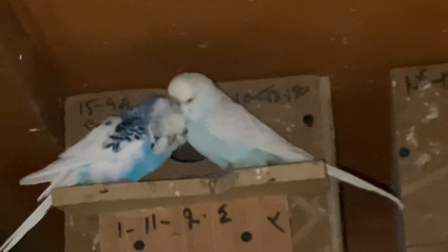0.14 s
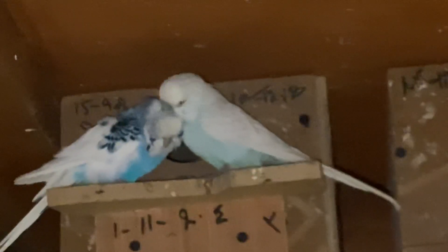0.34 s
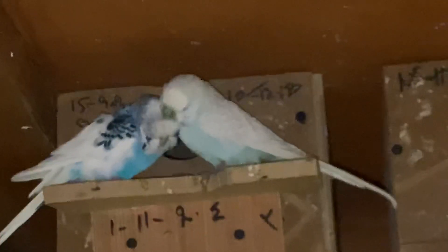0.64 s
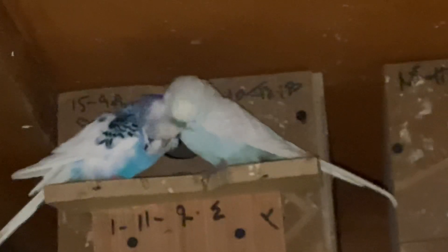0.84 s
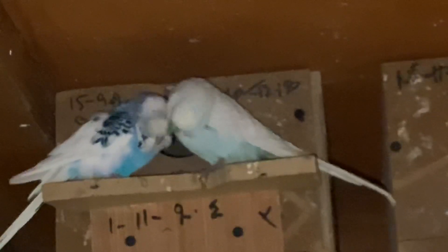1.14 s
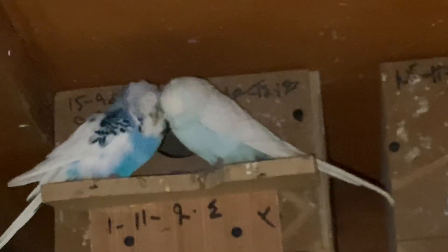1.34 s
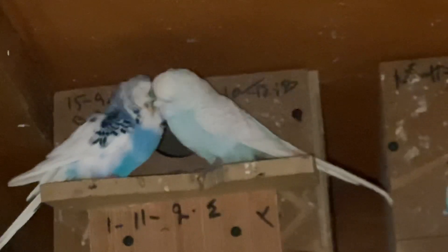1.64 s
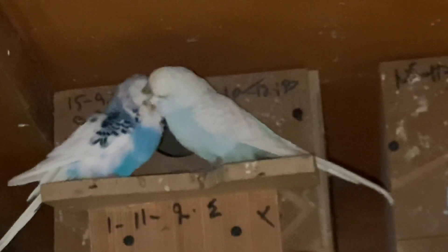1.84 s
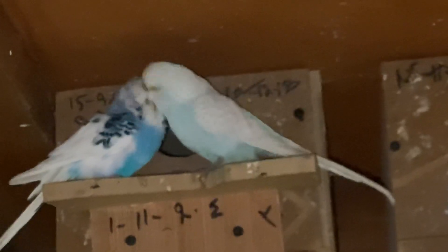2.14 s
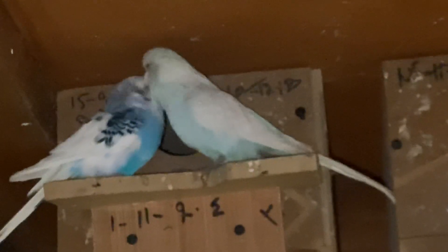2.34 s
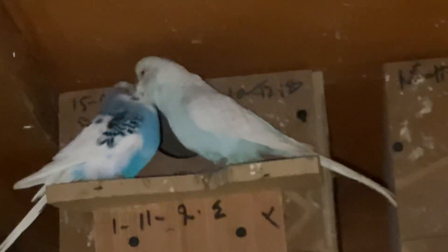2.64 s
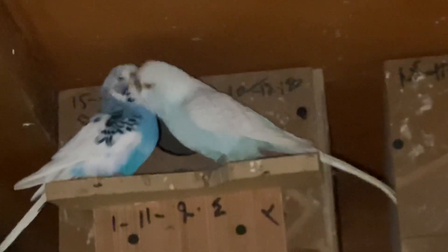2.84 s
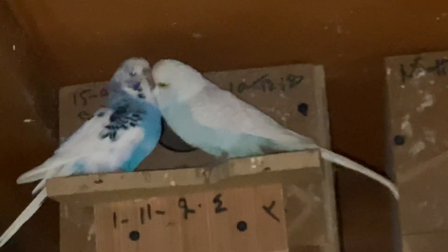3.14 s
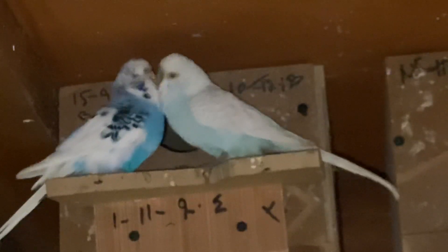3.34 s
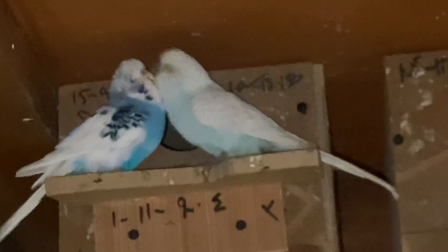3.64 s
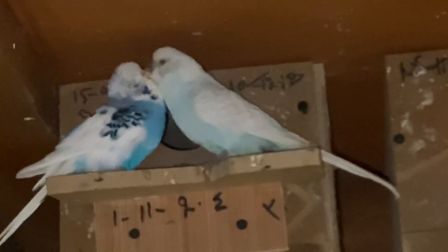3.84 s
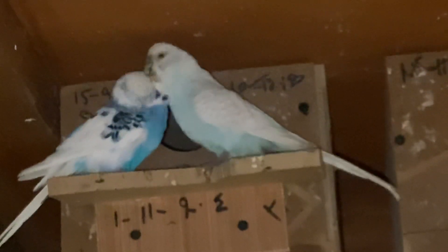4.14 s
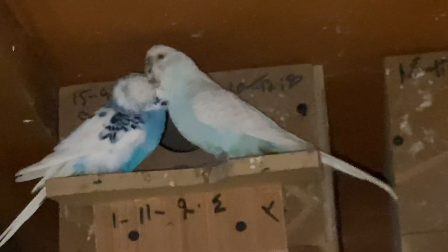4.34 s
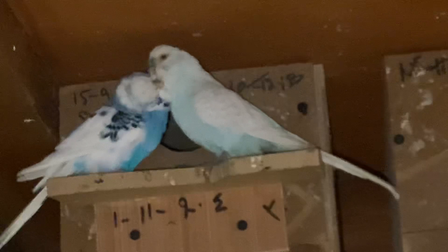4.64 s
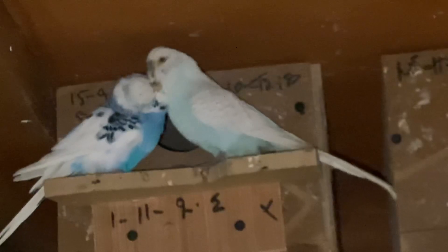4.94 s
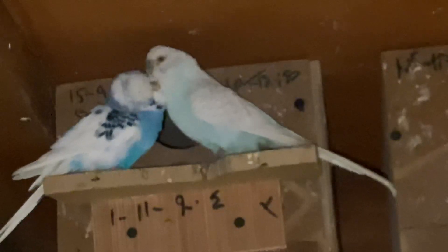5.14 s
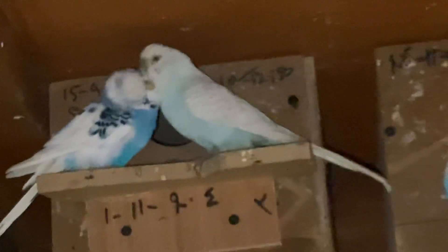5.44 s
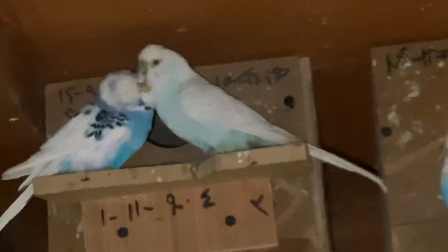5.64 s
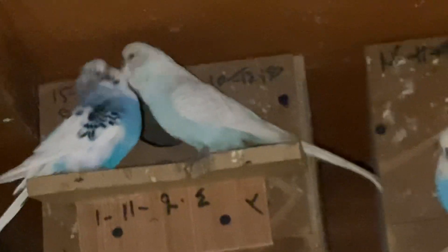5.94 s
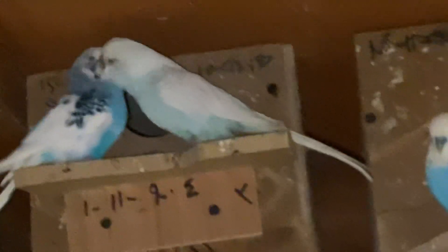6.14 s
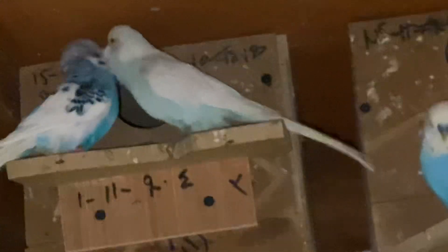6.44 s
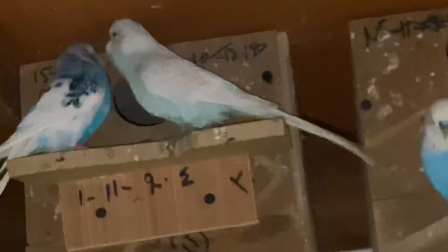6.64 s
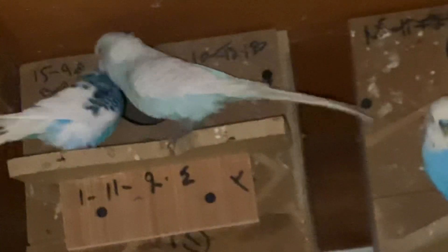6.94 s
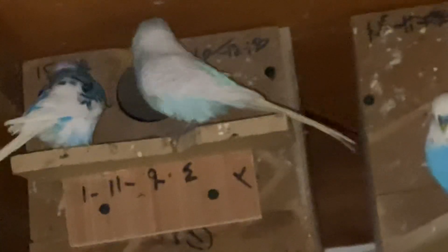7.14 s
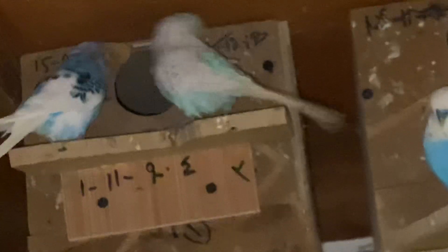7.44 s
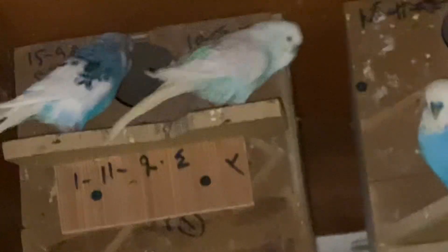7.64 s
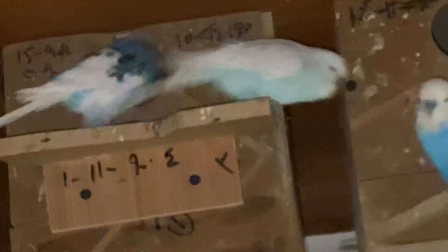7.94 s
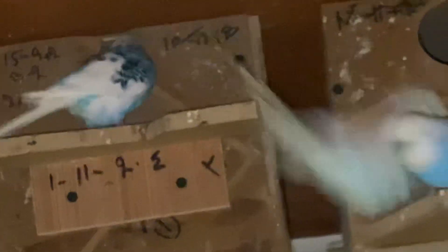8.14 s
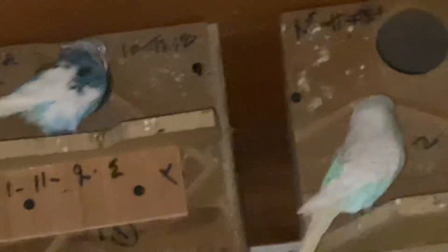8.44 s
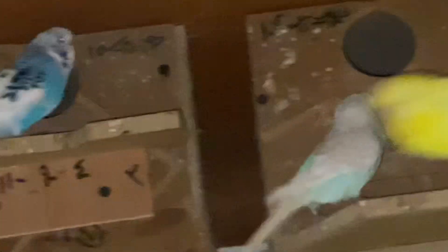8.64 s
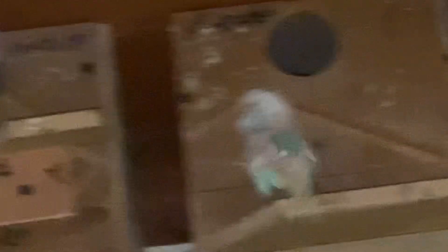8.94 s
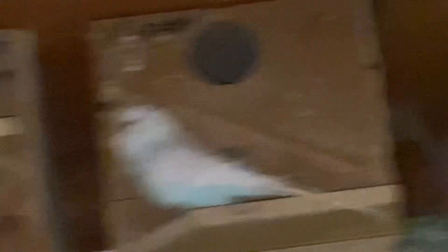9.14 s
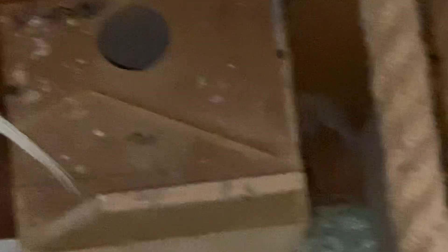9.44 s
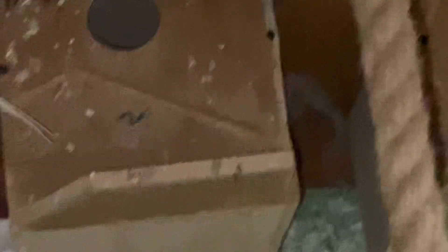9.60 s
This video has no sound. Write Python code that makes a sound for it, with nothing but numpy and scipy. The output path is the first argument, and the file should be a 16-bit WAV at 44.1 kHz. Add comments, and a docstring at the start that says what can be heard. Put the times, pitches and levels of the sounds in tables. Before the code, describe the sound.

A low, wavering hum fills an echoing wooden bird room. Small parrots give quick gliding chirps separated by pauses, with faint chatter from birds farther away. Low, gentle warbling and a hollow wing flutter gather midway, then thin out again. Finally several loud, raspy squawks arrive in rapid succession, mixed with bright whistles, thicker chatter and bursts of wingbeats, all heard from a little distance with a narrow stereo spread.

```python
"""Whistled notes open the scene: budgerigars in a bare, echoing room, near ones warbling softly, others far off.
Harsh buzzing squawks break in, more densely towards the end; wings flap in short flights over chatter and hum.
Whistles are gliding tones with overtones, squawks are rapidly restarted upward sweeps roughened by breath,
wing beats are short windowed tones, and the room hum is shaped noise. Decaying noise forms the echo."""
import sys
import numpy as np
from scipy import signal
from scipy.fft import rfft, irfft, next_fast_len
from scipy.io import wavfile
from scipy.ndimage import uniform_filter1d, map_coordinates

SR = 44100
rng = np.random.default_rng(int(sys.argv[2]) if len(sys.argv) > 2 else 0)


def bounce(signal):
    """Save signal as a 16-bit WAV file at the path given by the first command-line argument."""
    frames = np.transpose(np.atleast_2d(signal))
    limited = np.clip(frames, -1, 1)
    pcm = np.round(limited * 32767).astype(np.int16)
    wavfile.write(sys.argv[1], SR, pcm)


N = 430857

# Below, "level" is that of the source before echo and filters; "overtones" is the second harmonic
# relative to the fundamental.
# Straight whistled glides. Each row: start in seconds, length in seconds, start pitch in Hz, end pitch in Hz,
# level in dB, distance in metres.
WHISTLE_NOTES = [(0, 0.061, 5800, 5420, -37.5, 7.5), (0.237, 0.079, 4460, 5460, -42.5, 7.6),
                 (0.383, 0.035, 2534, 2424, -36.5, 0.75), (0.465, 0.023, 3500, 2560, -38.5, 0.28),
                 (0.475, 0.038, 2590, 2420, -37, 0.53), (0.48, 0.066, 4510, 4980, -42.5, 5.9),
                 (0.506, 0.012, 1990, 1410, -42, 2.3), (2.432, 0.056, 5850, 5740, -59.5, 5.6),
                 (2.479, 0.062, 5030, 4300, -55, 7.2), (3.03, 0.024, 2030, 1490, -55, 1.7),
                 (3.119, 0.015, 3020, 3140, -58.5, 2.1), (3.274, 0.053, 3550, 3960, -61.5, 5.3),
                 (3.444, 0.025, 3290, 3550, -39.5, 10.3), (3.485, 0.02, 2674, 2990, -33, 3.6),
                 (3.518, 0.06, 6180, 5870, -36.5, 5.9), (3.554, 0.042, 4900, 4190, -32, 6.1),
                 (3.939, 0.16, 2448, 2240, -44, 9), (4.266, 0.051, 3000, 2940, -57, 2.2),
                 (4.455, 0.023, 2300, 2230, -57, 1.9), (4.461, 0.022, 6030, 5020, -51, 3.4),
                 (4.778, 0.06, 5450, 6500, -58, 6), (4.863, 0.062, 4150, 4210, -47.5, 4.3),
                 (4.842, 0.032, 3073, 3225, -37.5, 4.5), (4.887, 0.023, 2776, 2560, -35, 5.9),
                 (4.926, 0.019, 1950, 1990, -40.5, 4.5), (5.243, 0.078, 1257, 1062, -52, 1.4),
                 (5.345, 0.038, 2964, 3256, -36, 5.4), (5.365, 0.037, 1870, 2090, -44, 1.8),
                 (5.388, 0.03, 2760, 2880, -34.5, 7.2), (5.585, 0.051, 1122, 1101, -44.5, 0.65),
                 (5.618, 0.049, 2013, 2103, -37, 11.6), (5.676, 0.039, 2600, 2720, -38.5, 5.6),
                 (5.705, 0.073, 1916, 1605, -43, 6.3), (5.76, 0.025, 2600, 2730, -37, 4.9),
                 (5.637, .04, 4060, 4000, -50, 5), (5.808, 0.06, 1527, 2350, -47, 1.1),
                 (5.888, 0.027, 2330, 1155, -45, 1.1), (5.935, 0.06, 1474, 1705, -44, 5.2),
                 (5.942, 0.064, 3370, 3240, -47.5, 3.9), (5.966, 0.027, 1410, 1035, -45, 2.7),
                 (5.993, 0.085, 1080, 1002, -47, 2.2), (6.135, 0.051, 1245, 2080, -47, 1.2),
                 (6.192, 0.049, 2295, 1594, -45.5, 0.51), (6.259, 0.082, 1410, 1436, -55.5, 0.4),
                 (6.346, 0.064, 2970, 3474, -35, 3.5), (6.402, 0.023, 2660, 2820, -30.5, 2.7),
                 (6.55, 0.0205, 3550, 3540, -33, 2.2), (6.578, 0.041, 3060, 2886, -31, 6.4),
                 (6.603, 0.065, 2060, 2122, -38, 7.1), (6.64, 0.0434, 3590, 3450, -29, 2.27),
                 (6.691, 0.068, 1987, 1642, -40, 11), (7.145, 0.054, 3150, 3130, -51.5, 6.8),
                 (7.245, 0.039, 3226, 3160, -42.5, 3.4), (7.281, 0.026, 2550, 2370, -46, 3),
                 (7.932, 0.069, 1223, 1236, -60.5, 2.6), (8.592, 0.036, 4690, 4580, -28, 7.3),
                 (8.619, .11, 3408, 3030, -26, 5.8), (8.725, 0.011, 1885, 1760, -31, 1),
                 (8.855, 0.032, 3040, 2250, -37, 1.4), (8.873, 0.0098, 4970, 4440, -32, 1.5),
                 (9.139, 0.022, 3160, 2100, -34.5, 2.2), (9.235, 0.023, 4240, 4200, -29.5, 0.77),
                 (9.368, 0.045, 4200, 2740, -40.5, 2.4), (9.359, 0.028, 2895, 1840, -44, 2.4),
                 (9.439, 0.067, 1834, 2520, -41.5, 3.7), (9.534, 0.031, 3990, 2440, -33, 5.9),
                 (9.598, 0.043, 3130, 3284, -26.5, 0.42), (9.66, 0.02, 2590, 1910, -39.5, 0.84)]
# Bent whistled notes. Each row: start in seconds, length in seconds, start, middle and end pitch in Hz,
# level in dB, overtones in dB, distance in metres.
BENT_NOTES = [(0.355, 0.022, 3800, 3930, 3860, -46.5, -2, 3.9),
              (0.406, 0.057, 2420, 3230, 3600, -35, -22.5, 1.34),
              (4.367, 0.097, 3300, 4190, 4470, -61.5, -24, 3.7),
              (4.558, 0.19, 1750, 2395, 1890, -40.5, -11.5, 4.35),
              (5.3, 0.052, 1090, 1244, 1460, -56, -0.5, 3.6),
              (5.411, 0.032, 2160, 2210, 1910, -44.5, -5.5, 0.74),
              (8.663, 0.053, 3320, 3550, 3660, -27, -13.5, 2.2),
              (8.89, 0.046, 4137, 3070, 1856, -27.5, -24, 2.7)]
# One long clean note that swells slowly. Each row: start in seconds, length in seconds,
# start, middle and end pitch in Hz, level in dB, overtones in dB.
PIPING_NOTES = [(0.839, .34, 1715, 1820, 2028, -28.5, -37)]
# Buzzing squawks. Each row: start in seconds, length in seconds, pitch in Hz, level in dB, overtones in dB.
SQUAWK_CALLS = [(1.139, 0.14, 3395, -48, -16.5), (2.806, 0.04, 2440, -47, -15),
                (2.922, 0.014, 2080, -50, -13), (3.185, 0.012, 1960, -53, -13),
                (3.214, 0.022, 1915, -51.5, -12), (3.509, 0.079, 2853, -36, 1.5),
                (5.574, 0.08, 2750, -44.5, -7), (6.091, 0.05, 2453, -41, -11.5),
                (6.406, 0.057, 2550, -41.5, -4), (6.561, 0.07, 2474, -49, 0),
                (6.68, 0.049, 2444, -30, -17.5), (7.228, 0.088, 2710, -46, -9.5),
                (8.329, 0.047, 2837, -38.5, 2), (8.424, 0.048, 2620, -36, 5.5),
                (8.529, 0.095, 2916, -35.5, 4), (8.625, 0.037, 3256, -30, 3.5),
                (8.722, 0.053, 2495, -36, 9), (8.827, 0.08, 3250, -30, -0.5),
                (8.936, 0.023, 2555, -38, -2.5), (9.01, 0.068, 3250, -38.5, 5.5),
                (9.063, 0.078, 3210, -33, 5.5), (9.135, 0.05, 2390, -50.5, 20.5),
                (9.217, 0.036, 2406, -40.5, 10.5), (9.282, 0.2, 2483, -43.5, -6.5),
                (9.597, 0.081, 3293, -32, 0), (9.707, 0.11, 2917, -33, 6.5)]
# Short flights. Each row: strongest wing beat in seconds, spread in seconds, peak level in dB.
WING_FLIGHTS = [(4.78, 0.2, -45.5), (5.95, 0.29, -43), (8.36, .14, -37), (9.31, 0.084, -37),
                (9.75, 0.16, -35.5)]
# Background levels over time. Each row: time in seconds, hum in dB, distant chatter in dB.
ROOM_LEVELS = [(0, -57.5, -63.5), (.95, -54.5, -71), (1.1, -51, -79), (1.65, -60.5, -70),
               (3.42, -55.5, -77), (3.95, -55.5, -53), (4.25, -60.5, -60), (4.8, -54.5, -59),
               (5.15, -55.5, -70.5), (5.8, -48.5, -62), (6.37, -56, -70), (6.9, -55.5, -91),
               (7.801, -58, -73), (8.3, -49.5, -61), (8.7, -52.5, -54), (9.3, -53, -58), (9.77, -44, -40)]
# Spectral shape of the hum. Each row: frequency in Hz, relative density in dB per Hz.
HUM_SPECTRUM = [(20, -24), (65, 2.5), (150, -6.5), (330, -7), (470, -8), (800, -10), (1300, -20.5),
                (1900, -17), (7000, -28), (11000, -25.5)]
# Phase between the two microphone ports. Each row: frequency in Hz, lead of the left in radians.
PORT_PHASE = [(400, -.1), (1300, -.75), (1750, .3), (3200, .55), (5000, 0), (7400, -.2), (8550, -3.14),
              (9730, -6.2), (10600, -6.7), (11800, -9.4), (12600, -9.45), (13250, -12.4), (15100, -13.3)]
# Microphone roll-off. Each row: frequency in Hz, gain in dB.
TREBLE_ROLLOFF = [(7000, 1), (11300, 0), (12000, -3), (15000, -13.5)]

EQUAL_ECHO_M, HEARD_DB = 2.55, 4.5  # distance where echo equals direct sound; gain of both together
OVERTONES_1KHZ_DB, THINS_DB_PER_OCTAVE = -4, 12  # overtones of a 1 kHz note; higher notes are purer
ROUGH, ROUGH_PER_M = .3, .1  # far voices arrive rougher
BEAT_S, FLAP_HZ = .0555, 479  # wing stroke period; mean pitch of the clap of air
TOP_HZ = 15480  # band limit


def birds():
    """Direct-to-reverberant ratio: near notes are mostly direct sound, far notes mostly echo."""
    out = np.zeros((2, N))
    notes = []
    for s, length, start_hz, end_hz, db, metres in WHISTLE_NOTES:
        middle_hz = (start_hz + end_hz) / 2
        over_db = OVERTONES_1KHZ_DB - THINS_DB_PER_OCTAVE * np.log2(middle_hz / 1000)
        notes.append((s, length, start_hz, middle_hz, end_hz, db, over_db, metres))
    for s, length, *path, db, over_db, metres in notes + BENT_NOTES:
        far = (metres / EQUAL_ECHO_M) ** 2  # echo power over direct power
        note = whistle(length, *path, over_db, rough=ROUGH + ROUGH_PER_M * metres)
        direct_db, echo_db = -10 * np.log10(1 + far), -10 * np.log10(1 + 1 / far)
        add_in_room(out, s, amp(db + HEARD_DB) * note, direct_db, echo_db)
    for s, length, *path, db, over_db in PIPING_NOTES:
        note = whistle(length, *path, over_db, rough=.4, rise=1.7)
        add_in_room(out, s, amp(db) * note, direct_db=-8, echo_db=3, t60=.75)
    for s, length, pitch_hz, db, over_db in SQUAWK_CALLS:
        add_in_room(out, s, amp(db) * squawk(length, pitch_hz, over_db), direct_db=3, echo_db=-4)
    return out


def whistle(length, start_hz, middle_hz, end_hz, over_db, rough, rise=0.026):
    """Frequency and amplitude modulation: a glide whose pitch and strength flutter fast, with a breathy rasp."""
    u = np.linspace(-1, 1, round(length * SR))  # -1 at the start of the note, 1 at its end
    bend_hz = (start_hz + end_hz) / 2 - middle_hz
    hz = middle_hz + (end_hz - start_hz) * u / 2 + bend_hz * u * u
    hz *= 1 + 0.04245 * rough * flutter(len(u), rate=250)
    swell = np.clip(np.minimum((1 + u) / rise, (1 - u) / 0.1), 0, 1)
    throb = amp(5.45 * rough * flutter(len(u), rate=304.6))
    throb *= 1 + 0.15 * rough * flutter(len(u), rate=4600)  # breath
    throb /= np.sqrt(np.mean(throb ** 2))
    return swell * throb * syrinx(hz, over_db)


def squawk(length, pitch_hz, over_db, rate=190, sweep=.33, breath=.95):
    """Periodic bursts: the voice restarts about rate times a second, each burst sweeping upward with breath."""
    t = np.arange(round(length * SR)) / SR
    cycle = (rate * t + 0.16 * flutter(len(t), rate=60)) % 1
    hz = pitch_hz * (1 + sweep * (cycle - .5) + 0.0513 * flutter(len(t), rate=80))
    bursts = np.sin(np.pi * cycle) ** 0.4 * syrinx(hz, over_db)
    swell = np.sin(np.pi * (t / length) ** .6) ** .7
    return swell * bursts * (1 + breath * flutter(len(t), rate=2300))


def syrinx(hz, over_db, fall_db=3.0):
    """Harmonic series: each overtone past the second harmonic falls by fall_db per kHz of the fundamental."""
    phase = 2 * np.pi * np.cumsum(hz) / SR
    k = np.arange(2, 7)[:, None]
    strength = amp(over_db - fall_db * (k - 2) * hz / 1000)
    strength = strength * (k * hz < SR / 2)  # nothing above half the sample rate
    overtones = strength * np.sin(k * phase)
    return np.sqrt(2) * (np.sin(phase) + overtones.sum(0))


def wings(count=8):
    """Impulsive air displacement: each stroke is a soft hollow flap; a flight swells and fades about its peak."""
    out, t = np.zeros((2, N)), np.arange(SR // 60) / SR
    for s, spread, db in WING_FLIGHTS:
        flight = np.zeros(SR)
        for k, (late_ms, pitch, loud) in enumerate(rng.standard_normal((2 * count, 3))):
            flap = np.hanning(len(t)) * np.sin(2 * np.pi * FLAP_HZ * (1 + .07 * pitch) * t)
            swell = np.exp(-((k - count) * BEAT_S / spread) ** 2 / 2)
            start = round((k * BEAT_S + abs(late_ms) / 1000) * SR)
            flight[start:][:len(t)] += amp(db + 2 * loud) * swell * flap
        add_in_room(out, s - count * BEAT_S - t[-1] / 2, flight, direct_db=-6, echo_db=-7)
    return out


def chatter(count=1500, size=SR // 5):
    """Random superposition: many distant birds' steep rough glides and squawks overlap, blurred by echo."""
    out, voices = np.zeros((2, N)), np.zeros(N + SR)
    times, _, level_db = np.transpose(ROOM_LEVELS)
    for when, pitch, bend, loud, kind in rng.random((count, 5)):
        s, hz = when * N / SR, 1900 * 3 ** pitch ** 1.6
        sweep = (.15 + .25 * bend) * np.sign(bend % .1 - .03)  # most fall
        if kind < .6:
            note = squawk(0.033, 2000 + 1300 * pitch, over_db=-4.5)
        else:
            note = whistle(.022, hz * (1 + sweep), hz, hz * (1 - sweep), over_db=-14, rough=1.7)
        gain = amp(np.interp(s, times, level_db) + 4 * loud - 4)
        voices[round(s * SR):][:len(note)] += gain * note
    for start in range(0, N, size):  # each stretch draws its own echo
        add_in_room(out, start / SR, voices[start:start + size], direct_db=3, echo_db=0.0)
    return out


def hum():
    """Stationary noise through a spectral envelope: broad room noise whose level wavers."""
    noise = filtered(rng.standard_normal((2, N)), lambda hz: amp(along(HUM_SPECTRUM, hz)))
    times, level_db, _ = np.transpose(ROOM_LEVELS)
    wavering_db = np.interp(np.arange(N) / SR, times, level_db) + 1.2 * flutter(N, rate=9.9)
    return amp(wavering_db) * noise / noise[0].std()


def add_in_room(out, s, sound, direct_db, echo_db, t60=0.64):
    """Reverberation: direct path in mid, plus the bare walls' echo in mid and side, which dulls as it dies."""
    t = np.arange(SR * 3 // 4) / SR
    noise = rng.standard_normal((2, len(t)))
    noise *= amp(5 * flutter(len(t), rate=200))  # reflections arrive in clumps
    dull = uniform_filter1d(noise, size=7)
    bright = noise - dull
    tail = dull * amp(-60 * t / t60) + bright * amp(-60 * t / (0.68 * t60))
    # the nearest walls answer first and strongest
    tail *= (1 - np.exp(-t / 0.0072)) * (1 + 2.2 * np.exp(-t / 0.035))
    tail *= amp(echo_db) / np.linalg.norm(tail[0])
    tail[0, 0] = amp(direct_db)
    heard = signal.fftconvolve(sound[None], tail, axes=1)
    spot = out[:, round(s * SR):][:, :heard.shape[1]]
    spot += heard[:, :spot.shape[1]]


def flutter(size, rate):
    """Band-limited randomness: a smooth curve through rate random knots a second."""
    knots = rng.standard_normal(int(size * rate / SR) + 4)
    return map_coordinates(knots, [np.arange(size) * rate / SR])


def filtered(x, response):
    """Linear filtering: the spectrum of x times a response of frequency in Hz."""
    m = next_fast_len(x.shape[-1] + 8192)
    spectrum = rfft(x, m) * response(np.fft.rfftfreq(m, 1 / SR))
    return irfft(spectrum, m)[..., :x.shape[-1]]


def along(points, hz):
    """Interpolation of (Hz, value) points on a logarithmic frequency axis."""
    f, v = np.transpose(points)
    return np.interp(np.log(hz + 1), np.log(f + 1), v)


def amp(db):
    """Decibels to amplitude ratio."""
    return 10 ** (np.asarray(db) / 20)


def scene():
    """Vocal-tract high-pass: windpipe and beak pass little below 1.5 kHz; both sides hear almost the same."""
    voices = filtered(birds() + chatter(), lambda hz: 1 / (1 + (1450 / (hz + 1)) ** 6))
    mid, side = voices + wings() + hum()
    return mid + amp(-24) * side * [[1], [-1]]


def record(dry):
    """Phase and magnitude response: each port turns the phase its own way; treble falls off to the band limit."""
    def response(hz):
        ports = np.exp(.5j * along(PORT_PHASE, hz) * [[1], [-1]])  # half the lead to each side
        return ports * amp(along(TREBLE_ROLLOFF, hz)) * (hz < TOP_HZ)
    return filtered(dry, response)


dry = scene()
out = record(dry)
bounce(out)
```